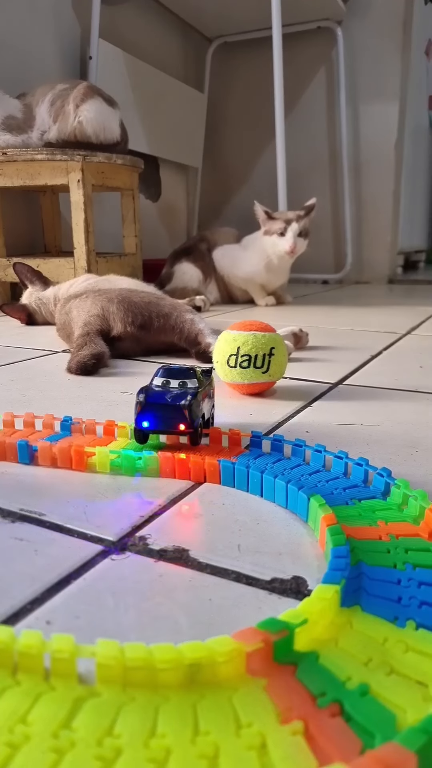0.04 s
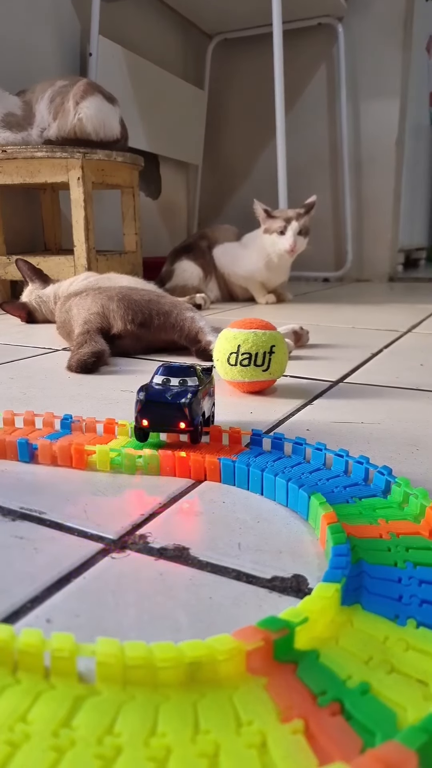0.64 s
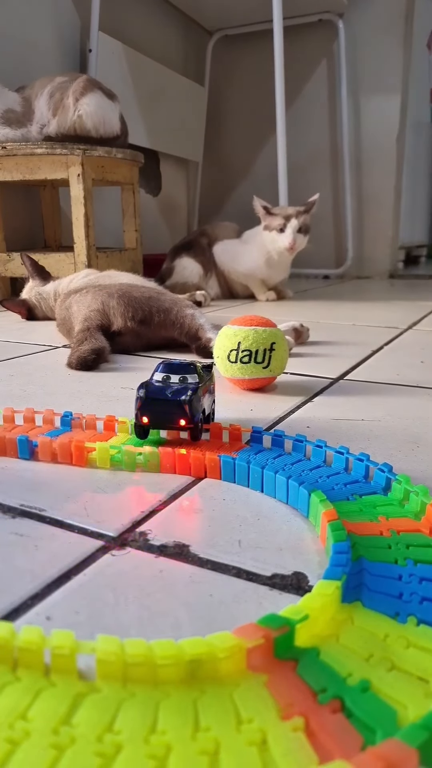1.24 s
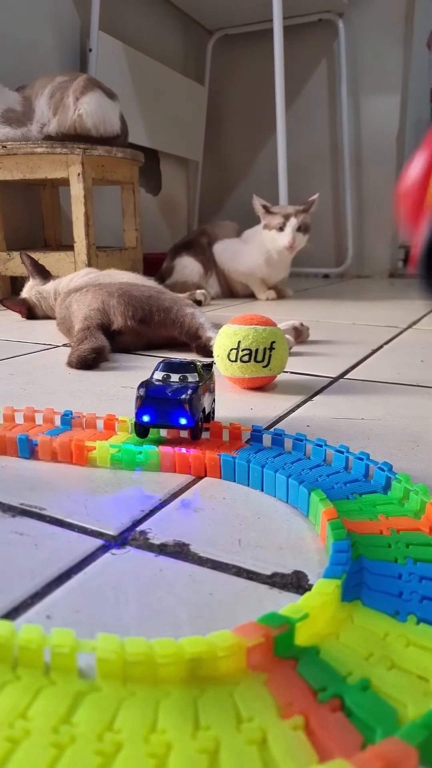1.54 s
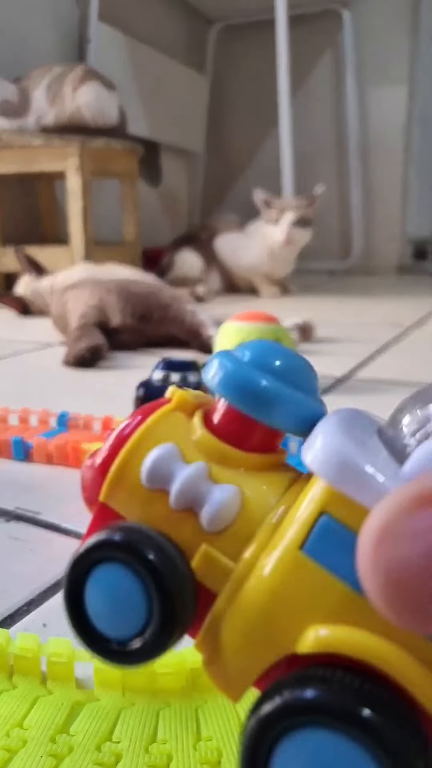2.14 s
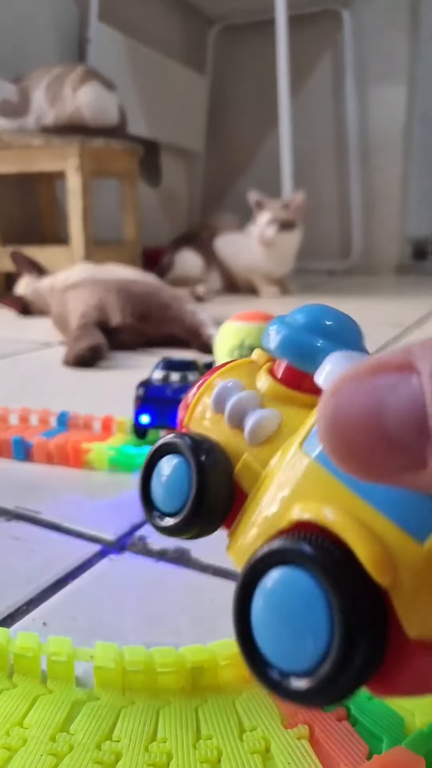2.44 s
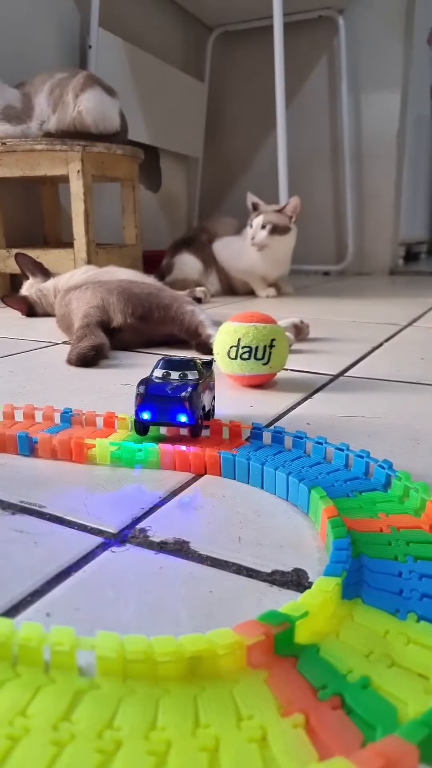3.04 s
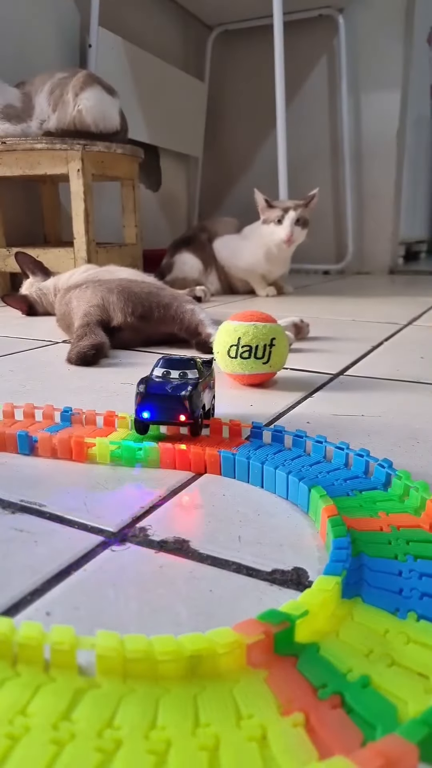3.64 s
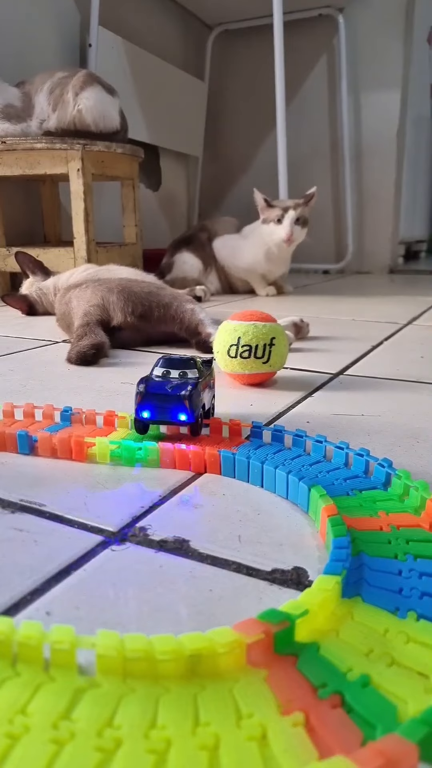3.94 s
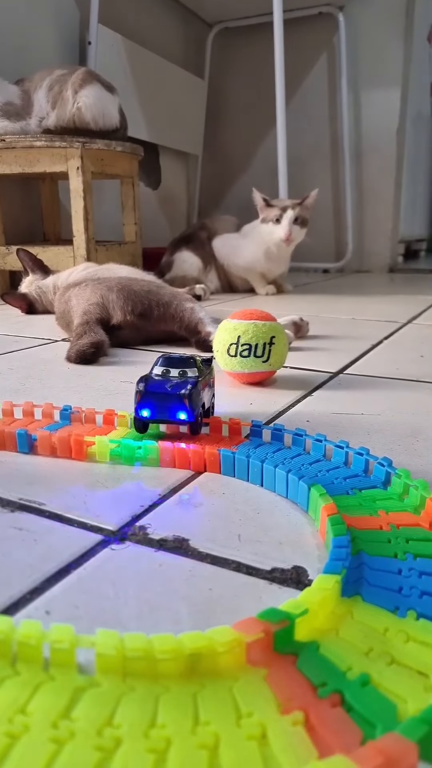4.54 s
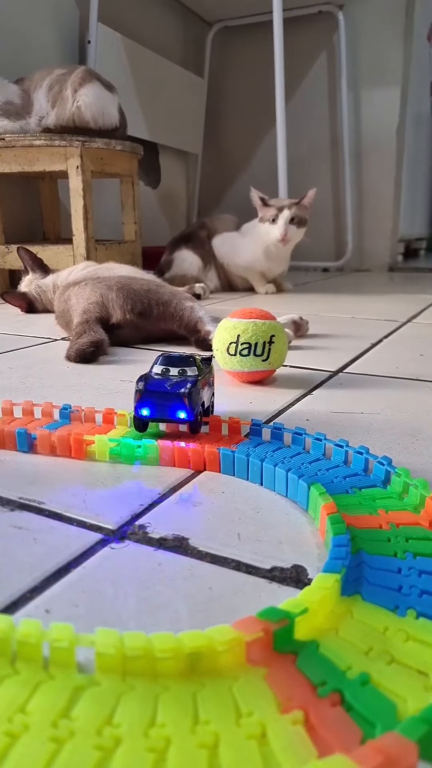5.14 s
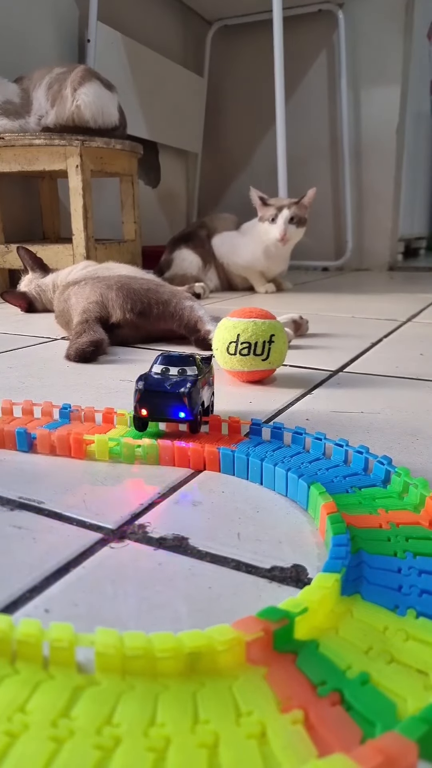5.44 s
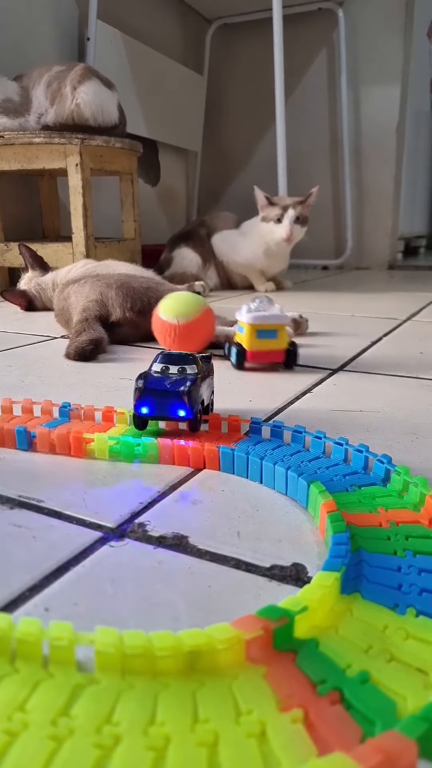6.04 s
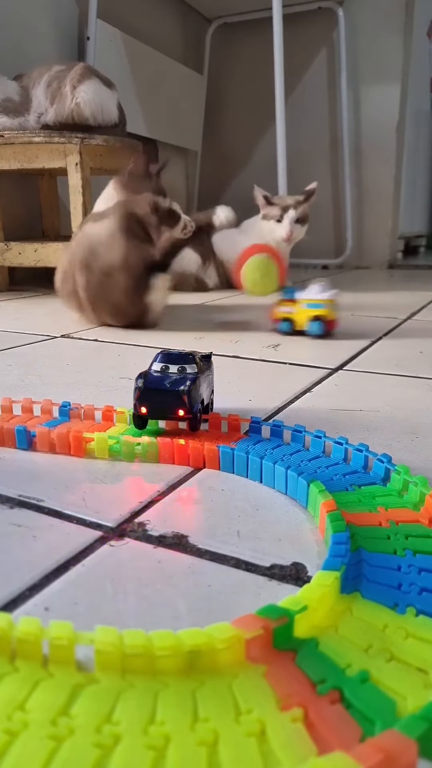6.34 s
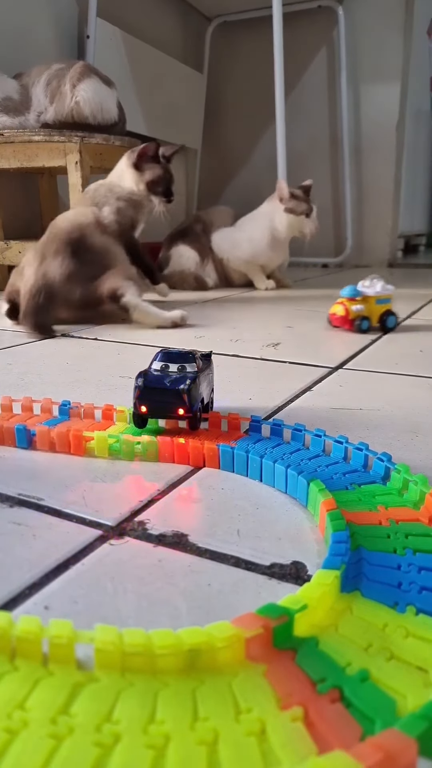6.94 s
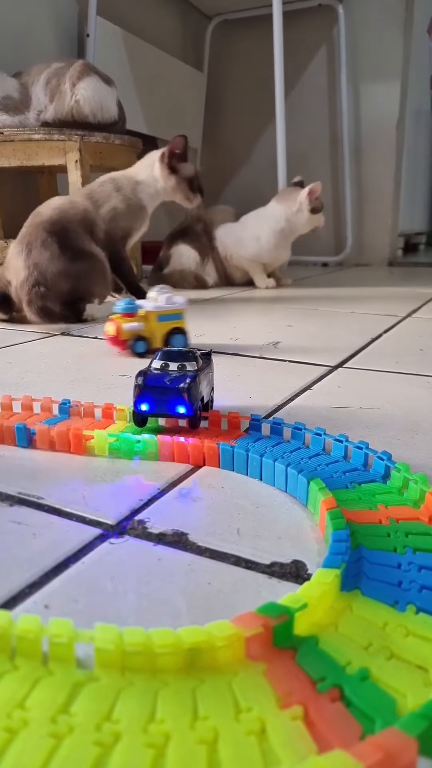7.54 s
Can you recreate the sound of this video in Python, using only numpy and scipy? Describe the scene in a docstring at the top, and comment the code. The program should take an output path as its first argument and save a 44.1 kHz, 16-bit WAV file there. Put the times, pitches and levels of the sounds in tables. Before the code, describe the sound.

A plastic toy car clacks and is pushed on a tiled floor, setting its gears whirring. Lifted close to the microphone, it fizzes and ticks while slowly running down. It clacks back onto the floor, is pushed again and let go, rattling further off and bumping a soft ball. Faint rubs and squeaks come from the handling, over a low room hum.

```python
"""A plastic flywheel toy car whirrs: it is pushed on a tiled floor, lifted close while its gears run down,
then pushed again and let go. It rattles off, bumps a ball and rolls back, further away.
One flywheel turns everything: gear teeth scrape and fizz, loose gears clatter in their case and shake
the hollow shell, and the axle ticks on its bearing. Jolts clack, wheels and fingers rub and squeak,
and the room hums low."""
import sys
import numpy as np
from scipy import signal
from scipy.fft import rfft, irfft, next_fast_len
from scipy.io import wavfile
from scipy.ndimage import map_coordinates

SR = 44100
rng = np.random.default_rng(int(sys.argv[2]) if len(sys.argv) > 2 else 0)


def persist_wave(psi):
    """Save psi, clipped to +-1, as 16-bit WAV."""
    counts = np.round(np.clip(psi, -1, 1) * 32767).astype(np.int16)
    wavfile.write(sys.argv[1], SR, np.atleast_2d(counts).T)


N = 343891

# where the car is: (time [s], share of its weight on the floor [0-1], distance [0 near, 1 far])
CAR_PLACE = [(0, 1, 0), (.7, 1, 0), (1.5, 0, 0), (3.6, 0, 0), (4.1, 1, 0), (5.3, 1, 0), (5.9, 1, 1),
             (7.8, 1, 1)]
# loudness of the running gears: (time [s], gear level [dB], treble level [dB])
WHIRR_LEVELS = [(0.66, -29, -35.5), (1.1, -30, -32), (1.5, -33, -28.5), (1.76, -30.5, -25.5),
                (2, -31, -32.5), (2.65, -30, -33), (3.02, -34.5, -36), (3.36, -39, -36.5), (3.68, -37, -39),
                (4.02, -29, -30), (4.2, -27.5, -30), (4.32, -27, -29.5), (4.6, -23.5, -31),
                (4.85, -25.5, -31), (5.25, -26.5, -34.5), (5.53, -22, -32.5), (5.73, -27.5, -38),
                (6.2, -32.5, -40.5), (6.95, -35.5, -39.5), (7.44, -35.5, -43), (7.8, -34.5, -44)]
# the axle's hardest catches: (time [s], level [dB])
AXLE_CATCHES = [(0.627, -10), (0.7158, -15), (.768, -18), (.824, -19), (.881, -20), (.935, -15.5),
                (.986, -19), (1.05, -19), (1.1443, -19), (1.2815, -15), (1.7569, -19), (1.8456, -19.5),
                (1.911, -16), (1.9759, -18), (2.1141, -14.5), (2.1824, -19), (2.5166, -19), (2.578, -19.5),
                (2.6598, -20), (2.7911, -19), (2.9542, -19), (3.0339, -22), (3.1014, -19), (3.187, -21),
                (3.3413, -16), (3.4984, -21), (3.5677, -22), (3.7234, -21)]
# jolts of the whole car: (time [s], level [dB], extra for its ring [dB], extra for its snap [dB])
CAR_JOLTS = [(0.024, -17.5, 8.5, -29), (0.049, -14.5, 2, -34), (0.102, -28, -6, -6), (0.159, -38, -8, -8),
             (0.211, -45, -9, 6), (0.405, -28, -1, -13), (0.414, -6, -3, -10), (0.429, -10, 0, -14),
             (.466, -24, 1, -4), (0.54, -11.5, 2, -6), (1.202, -5, -14, -28), (1.207, -14, -7, -25),
             (1.222, -8.5, -11, -26), (1.24, -9, -7, -24), (3.796, -15, 6, -22), (3.812, -10, -1, -18),
             (3.876, -15, 9, -24), (3.999, -6, 7.5, -27), (4.042, -7, 5, -22), (4.212, -12, 0, -21),
             (5.862, -19, -8, -26), (6.099, -12, -9, -30), (6.22, -18.5, 1, -17), (6.326, -18.5, 5, -11),
             (6.39, -12.5, -12, -6), (6.432, -16.5, 1, -16), (7.633, -21, 9, -21), (7.699, -12, -12, -40),
             (7.734, -19, 4, -28)]


def amp(db):
    """Turn decibels into a gain."""
    return 10 ** (np.asarray(db) / 20)


def unit(x):
    """Scale a sound so that the average of its channels has a strength (rms) of 1."""
    return x / np.sqrt(np.mean(np.atleast_2d(x).mean(0) ** 2) + 1e-20)


def curves(rows):
    """Join a table's rows with straight lines: one curve for each column after the time."""
    s, *columns = np.transpose(rows)
    return [np.interp(np.arange(N) / SR, s, column) for column in columns]


def wobble(rate):
    """A smooth random curve that heads for a new value `rate` times a second."""
    points = rng.standard_normal(int(N * rate / SR) + 4)
    return map_coordinates(points, [np.arange(N) * rate / SR], order=2)


def swells(rows):
    """One curve per stroke: it rises to 1 at its hardest moment and falls away."""
    s, rise_s, fall_s = np.transpose(rows)[:3, :, None]
    t = np.arange(N) / SR - s
    return np.exp(-np.maximum(-t / rise_s, t / fall_s))


def coloured(x, colour, size=2048):
    """Pass a stereo sound through a body whose colour makes some pitches louder than others."""
    hz, db = np.transpose(colour)
    gain = amp(np.interp(np.log(np.fft.rfftfreq(size, 1 / SR) + 1), np.log(hz), db))
    # folding the cepstrum makes the body ring after a blow, never before it
    cepstrum = irfft(np.log(np.maximum(gain, 1e-4)))
    cepstrum[1:size // 2] *= 2
    cepstrum[size // 2 + 1:] = 0
    ring = irfft(np.exp(rfft(cepstrum)))
    return signal.oaconvolve(x, ring[None] / np.linalg.norm(ring), axes=1)[:, :N]


def noise(colour, side_db):
    """Coloured stereo noise, mostly shared by both sides."""
    mid, side = coloured(rng.standard_normal((2, N)), colour, size=8192)
    return unit(np.array([mid + amp(side_db) * side, mid - amp(side_db) * side]))


def panned(x, left_db):
    """Lean a sound to one side, keeping its centre level."""
    left = amp(left_db)
    return x * np.array([[left], [1]]) * 2 / (1 + left)


def glides(rows, flutter):
    """Wavering tones that swell, slide in pitch and fade."""
    out, waver = np.zeros(N), 1 + flutter * wobble(40)
    for start, length, first_hz, last_hz, db in rows:
        span = np.arange(round(start * SR), min(N, round((start + length) * SR)))
        u = np.linspace(0, 1, len(span))
        hz = (first_hz + u * (last_hz - first_hz)) * waver[span]
        out[span] += amp(db) * np.sqrt(8 * u * (1 - u)) * np.sin(2 * np.pi * np.cumsum(hz) / SR)
    return out


def contacts(at, sizes, chatter_t60, chatter_db, room_db, early_t60=.04, early_db=-3, spots=5):
    """Blows land on a few spots, each with its own chatter, early floor echoes and room echo."""
    t = np.arange(SR // 5) / SR
    spot = rng.integers(spots, size=len(at))
    out = np.zeros((2, N))
    def dying(t60, channels=2):
        """A burst of noise that fades by 60 dB in t60 seconds."""
        burst = rng.standard_normal((channels, len(t))) * amp(-60 * t / t60)
        return burst / np.linalg.norm(burst, axis=1, keepdims=True)
    for k in range(spots):
        direct = (t == 0) + amp(chatter_db) * dying(chatter_t60, channels=1)
        echoes = amp(early_db) * dying(early_t60) + amp(room_db) * dying(t60=.22)
        blows = np.bincount(np.clip(at, 0, N - 1), sizes * (spot == k), N)
        out += signal.oaconvolve(blows[None], direct / np.linalg.norm(direct) + echoes, axes=1)[:, :N]
    return out


def slips(s, strength, spread_s=.003, count=20):
    """Each catch of a moving part is a short cluster of slips, strongest in its middle."""
    offset, scatter = rng.standard_normal((len(s), 2, count)).swapaxes(0, 1)
    offset[:, 0] = 0
    sizes = strength[:, None] * amp(2.5 + 1.1 * scatter) * np.exp(-1.15 * np.abs(offset))
    at = np.round((s[:, None] + .001 + spread_s * offset) * SR).astype(int)
    return contacts(at.ravel(), sizes.ravel(), chatter_t60=.02, chatter_db=-9, room_db=-3,
                    early_t60=.025, early_db=3)


def passes(turns):
    """The samples at which a new turn begins."""
    return np.flatnonzero(np.diff(np.floor(turns)) > 0)


def room():
    """A wavering low hum over a soft rumble; faint low tones come and go."""
    # the hum's note: (time [s], pitch [Hz])
    hum_pitch = [(0, 69.2), (.25, 62), (.6, 50), (1, 48.6), (2.5, 47.3), (4.5, 48.96), (7, 48.1), (7.8, 50)]
    # loudness of the hum and of the rumble: (time [s], level [dB])
    hum_level = [(0, -41), (.15, -42), (.25, -54), (1, -45.5), (2.5, -45), (2.8, -51.5), (5.3, -59),
                 (5.55, -49.5), (6.7, -47), (6.85, -39), (7.6, -34.5), (7.8, -31)]
    rumble_level = [(0, -46.5), (.5, -47), (1, -46.5), (2.2, -47.5), (2.95, -42.5), (3.3, -45), (4, -42.5),
                    (4.3, -49), (5.6, -46.5), (7.8, -46)]
    # the rumble's colour: (frequency [Hz], level [dB])
    rumble_colour = [(20, -21), (45, -2.5), (65, -6), (90, 0.5), (105, -6), (125, 2.5), (180, -9),
                     (250, -15.5), (500, -27), (2000, -42), (15000, -39)]
    # the faint tones: (start [s], length [s], first pitch [Hz], last pitch [Hz], level [dB])
    drones = [(1.55, 0.75, 192, 184.5, -52), (6.1, 0.94, 144, 144, -49.5), (6.75, 0.36, 121.9, 135.6, -45)]
    hz = curves(hum_pitch)[0] + 1.9 * wobble(26)
    hum_db = curves(hum_level)[0] + 1.9 + 1.9 * wobble(24)
    hum = np.sqrt(2) * np.sin(2 * np.pi * np.cumsum(hz) / SR) * amp(hum_db)
    rumble = noise(rumble_colour, side_db=-26) * amp(curves(rumble_level)[0] + .96 * wobble(23))
    return panned(hum, left_db=-4.5) + panned(rumble, left_db=-1) + glides(drones, flutter=.0065)


def shaken(settle_s=.028, far_db=-5):
    """How hard the loose parts rattle after each jolt; they soon settle, and are fainter far off."""
    s, db = np.transpose(CAR_JOLTS)[:2]
    at = np.round(s * SR).astype(int)
    energy = np.bincount(at, amp(db + far_db * curves(CAR_PLACE)[1][at]) ** 2, N)
    return np.sqrt(signal.lfilter([1], [1, -np.exp(-2 / (settle_s * SR))], energy))


def rubbing(roll_db=-57, thud_db=-43):
    """Wheels and fingers make a dull, uneven rub that swells with each scuff and jolt."""
    # the rub's colour: (frequency [Hz], level [dB])
    rub_colour = [(120, -18), (220, -1), (320, -6), (440, 2), (620, -4), (900, -0.5), (1500, -23.5)]
    # wheels scuff the tiles or fingers slide on the shell: (time [s], rise [s], fall [s], level [dB])
    scuffs = [(.02, 0.034, 0.16, -52), (.55, 0.06, 0.036, -35), (2.62, 0.21, 0.29, -45.5),
              (3.02, 0.089, 0.17, -44.5), (4.15, 0.089, 0.057, -45), (5.58, 0.062, 0.043, -50)]
    # fingers squeak on plastic: (start [s], length [s], first pitch [Hz], last pitch [Hz], level [dB])
    squeaks = [(.475, 0.035, 443, 540, -40), (.545, 0.058, 620, 820, -43), (2.35, 0.58, 438, 433, -57.5),
               (2.92, 0.12, 407, 380, -49.5)]
    scuff_power = amp(np.transpose(scuffs)[3]) ** 2 @ swells(scuffs) ** 2
    gain = np.sqrt(amp(roll_db) ** 2 + scuff_power + (amp(thud_db) * shaken()) ** 2)
    rub = noise(rub_colour, side_db=-10) * gain * amp(1.5 * wobble(30))
    return rub + glides(squeaks, flutter=.017)


def ball_bump():
    """The car hits a soft ball, which takes the blow without ringing."""
    # the hit: (time [s], level [dB])
    hit = (6.386, -16.5)
    # the ball's dull colour: (frequency [Hz], level [dB])
    ball_colour = [(80, -12), (200, -1), (400, -4), (750, -2), (1000, 3), (1800, -8), (3500, -1),
                   (8000, -19)]
    s, db = hit
    blow = contacts([round(s * SR)], amp([db + 11]), chatter_t60=.024, chatter_db=26, room_db=-2, spots=1)
    return coloured(blow, ball_colour)


def far_clacks(at, sizes, detune):
    """Further off, a blow is heard as the shell's short ringing notes, a little different each time."""
    # the shell's own notes: (pitch [Hz], level [dB], time to fade by 60 dB [s])
    shell_notes = [(1400, -9, .025), (2170, -2, 0.02), (2600, 0.5, 0.021), (2930, -5, .018),
                   (4480, -2, 0.02), (6620, -17, 0.012)]
    hz, db, t60 = np.transpose(shell_notes)[:, :, None]
    attack_s, scatter_db, echo_db, echo_t60 = .0009, 2, -23, .035
    t = np.arange(SR // 20) / SR
    out = np.zeros((2, N + len(t)))
    for start, size in zip(at, sizes):
        pitch, level = rng.standard_normal((2, len(hz), 1))
        fade = amp(db + scatter_db * level - 60 * t / t60)
        notes = fade * np.sin(2 * np.pi * hz * (1 + detune * pitch) * t)
        clack = notes.sum(0) * (1 - np.exp(-t / attack_s))
        clack *= size / np.abs(clack).max()
        path = (t == 0) + amp(echo_db - 60 * t / echo_t60) * rng.standard_normal((2, len(t)))
        out[:, start:start + len(t)] += signal.fftconvolve(path, clack[None], axes=1)[:, :len(t)]
    return out[:, :N]


def shell_jiggle(clacks_per_s=90, over_whirr_db=4.5, scatter_db=2):
    """Once the car rolls away over the tiles, its loose shell chatters unevenly."""
    at = np.flatnonzero(rng.random(N) < clacks_per_s * curves(CAR_PLACE)[1] / SR)
    scatter = np.clip(rng.standard_normal(len(at)), -2, 2)
    db = curves(WHIRR_LEVELS)[0][at] + over_whirr_db + scatter_db * scatter
    return far_clacks(at, amp(db), detune=.012)


def jolts():
    """The car meets the floor, hand or ball: its shell clacks, its hollow rings, with a hard snap."""
    # colours of the clack, ring and snap: (frequency [Hz], level [dB])
    clack_colour = [(100, -32), (400, -23), (800, -14.5), (1150, 7), (1480, 14.5), (2000, -1), (2850, 2.5),
                    (3700, 2), (5000, 9.5), (6500, 5.5), (9000, 0.5), (12000, -36)]
    ring_colour = [(700, -30), (1250, -24), (1450, -6), (1550, 1.5), (1700, -15), (2100, -23), (4000, -60)]
    snap_colour = [(3000, -52), (7000, 4.5), (9000, -8), (10500, -4.5), (13500, 1.5), (15500, -34)]
    s, db, ring_db, snap_db = np.transpose(CAR_JOLTS)
    at = np.round(s * SR).astype(int)
    away = curves(CAR_PLACE)[1]
    clack = contacts(at, amp(db + 10), chatter_t60=.03, chatter_db=26, room_db=-6,
                     early_t60=.03, early_db=0)
    ring = contacts(at, amp(db + ring_db + 7.5), chatter_t60=.025, chatter_db=10, room_db=-7, early_db=-5)
    snap = contacts(at, amp(db + snap_db + 16.5), chatter_t60=.012, chatter_db=4, room_db=-2, early_db=3)
    near = coloured(clack * (1 - away), clack_colour)
    far = far_clacks(at, amp(db) * away[at], detune=.015)
    return near + far + coloured(ring, ring_colour) + coloured(snap, snap_colour)


def wheel_turns(turns, gear_ratio=7.5):
    """Turn flywheel turns into wheel turns, counted from the spot where the axle catches."""
    count = turns / gear_ratio
    at = np.round(np.transpose(AXLE_CATCHES)[0] * SR).astype(int)
    spot = np.unwrap(2 * np.pi * (count[at] % 1)) / (2 * np.pi)
    return count - np.interp(np.arange(N), at, spot)


def axle_ticks(turns, graze_db=8, scatter_db=1):
    """The lifted axle grazes its bearing once a wheel turn; now and then it catches harder."""
    # a tick's colour: (frequency [Hz], level [dB])
    tick_colour = [(500, -26), (1400, -2.5), (2200, -10), (4000, -23), (5200, -2), (6200, -2.5),
                   (7300, -3.5), (9000, -33), (15000, -8)]
    catch_s, catch_db = np.transpose(AXLE_CATCHES)
    at = passes(wheel_turns(turns))
    lifted = 1 - curves(CAR_PLACE)[0][at]
    db = curves(WHIRR_LEVELS)[0][at] + graze_db + scatter_db * rng.standard_normal(len(at))
    ticks = slips(np.r_[catch_s, at / SR], np.r_[amp(catch_db), lifted * amp(db)])
    return coloured(ticks, tick_colour) * amp(2)


def running_db(stall_s=.055, start_s=.412):
    """A feeble first spin dies away; once the flywheel is set going, the gears run at full level."""
    feeble_db, fall_db_per_s, rest_db = -15, 150, -35
    t = np.arange(N) / SR
    dying_db = np.maximum(feeble_db - fall_db_per_s * np.maximum(t - stall_s, 0), rest_db)
    return np.where(t < start_s, dying_db, 0)


def cog_knocks(turns, knock_db=8.5, scatter_db=1.4, body_db=-3):
    """While it drives the wheels, the half-speed gear knocks once a turn; at times it jumps a tooth."""
    # teeth jump under load: (time [s], level [dB])
    jumps = [(0.5582, -13), (0.585, -14), (0.606, -11), (4.1104, -11), (4.1188, -15), (4.1384, -13),
             (4.1624, -7.5), (4.17, -11), (4.1844, -9), (4.194, -11), (4.5455, -13), (4.5756, -12.5),
             (4.7243, -13), (4.767, -15), (4.814, -16), (4.8654, -15), (5.049, -15), (5.1179, -14.5),
             (5.257, -14.5), (5.3309, -12.5), (5.4011, -12.5), (5.4701, -12), (5.5464, -13)]
    # colours of the gear's click and the body's answer: (frequency [Hz], level [dB])
    click_colour = [(2500, -30.5), (3900, -17), (4950, 7.5), (5900, 1.5), (6900, 5), (8000, -6.5),
                    (9000, -7), (12000, -43)]
    body_colour = [(500, -50.5), (1000, -10), (1470, 5), (1950, -16.5), (2350, -5.5), (2800, 2),
                   (3400, -30.5), (4500, -37.5)]
    grounded, away = curves(CAR_PLACE)
    at = passes(turns / 2)
    load = grounded[at] ** 10 * (1 - .7 * away[at])
    whirr_db = curves(WHIRR_LEVELS)[0] + running_db()
    db = whirr_db[at] + knock_db + scatter_db * rng.standard_normal(len(at))
    jump_s, jump_db = np.transpose(jumps)
    s, strength = np.r_[jump_s, at / SR], np.r_[amp(jump_db), load * amp(db)]
    click, body = slips(s, strength), slips(s, strength)
    return coloured(click, click_colour) + amp(body_db) * coloured(body, body_colour)


def placed(x, held, near, far):
    """A part has one colour in the hand, one on the floor nearby and one further off."""
    grounded, away = curves(CAR_PLACE)
    shares = 1 - grounded, grounded * (1 - away), grounded * away
    return sum(share * unit(coloured(x, colour)) for share, colour in zip(shares, (held, near, far)))


def part_gain(level_db, response, push):
    """How loud one part is: its level in that place, raised by a push, plus its rattle after jolts."""
    held_db, near_db, far_db, push_db, jolt_db = response
    grounded, away = curves(CAR_PLACE)
    place_db = (1 - grounded) * held_db + grounded * ((1 - away) * near_db + away * far_db)
    return np.hypot(amp(level_db + running_db() + place_db + push_db * push), amp(jolt_db) * shaken())


def resonance(blows, track, width_hz):
    """A gliding ring: the blows are shifted down to 0 Hz, kept in a narrow band and shifted back."""
    hz, db = curves(track)
    spin = np.exp(2j * np.pi * np.cumsum(hz) / SR)
    band = signal.butter(2, width_hz / 2, fs=SR)
    return unit((signal.lfilter(*band, blows / spin) * spin).real) * amp(db + running_db())


def ringing(clatter):
    """The clatter makes the gear case whine, the gears sizzle and the car's hollow sing one note."""
    # these three rings shift with grip, load and distance: (time [s], pitch [Hz], level [dB])
    whine = [(.42, 4500, -35), (.5, 5000, -44), (.62, 5750, -31), (.68, 5350, -41), (.95, 5270, -39),
             (1.15, 5200, -44), (1.33, 5080, -37), (1.45, 5050, -46), (1.6, 5200, -52), (3.99, 6000, -62),
             (4.002, 6050, -25), (4.05, 5900, -39), (4.17, 5000, -30), (4.24, 5000, -45), (4.6, 4960, -42),
             (5.4, 4880, -41), (5.8, 4550, -45), (5.9, 4500, -38), (6.08, 4500, -38), (6.2, 4480, -46),
             (7.3, 4480, -50), (7.55, 4490, -41)]
    sizzle = [(.45, 13800, -38), (.6, 13500, -33), (.7, 13900, -44), (1.251, 13800, -48), (1.6, 13700, -33),
              (2.4, 14500, -30.5), (2.9, 13730, -34.5), (3.202, 14150, -54), (4.2, 13310, -42),
              (5.3, 13800, -53), (6.1, 14290, -41), (6.8, 13400, -52)]
    hollow_note = [(.42, 1490, -29), (.47, 1490, -31.5), (.585, 1523, -19.5), (.67, 1460, -38),
                   (1.149, 1475, -36.5), (1.42, 1460, -45), (1.65, 1500, -36.5), (2.3, 1340, -55),
                   (3.151, 1484, -43.5), (3.68, 1410, -48.5), (3.8, 1500, -35), (3.97, 1560, -38),
                   (4.01, 1550, -35), (4.08, 1550, -31), (4.135, 1480, -18), (4.29, 1397, -41.5),
                   (4.661, 1460, -32.5), (5.01, 1490, -37), (5.52, 1402, -27), (5.7, 1362, -32),
                   (6.3, 1382, -38.5), (6.8, 1430, -38), (7.8, 1426, -44.5)]
    high = resonance(clatter, whine, width_hz=360) + resonance(clatter, sizzle, width_hz=1400)
    return high + resonance(clatter + clatter.mean(0), hollow_note, width_hz=177)


def teeth_fizz(turns, scrape_s=.0003):
    """Two gears meet eight and nine teeth per flywheel turn, and every tooth scrapes briefly."""
    # the teeth's colour in the hand, nearby and far off: (frequency [Hz], level [dB])
    held = [(5760, -29), (9800, -2), (10700, -3), (11300, -3.5), (12500, -4), (13700, -1), (14500, 0),
            (15200, 12.5), (15500, 6), (16000, 1.5)]
    near = [(5760, -32), (9800, 2), (11000, -1.5), (11700, 5), (12800, 1), (14200, 8), (14900, 10),
            (15300, 13), (16000, 4)]
    far = [(5760, -38), (9800, -6), (10400, -4.5), (11300, 2.5), (12050, -5), (13000, -1), (14200, 1.5),
           (15400, 3.5), (16000, -6)]
    first, second = passes(8 * turns), passes(9 * turns)
    at = np.r_[first, second]
    gear_db = np.r_[np.zeros(len(first)), np.full(len(second), -4)]
    lean_db = 2.2 * np.sin(2 * np.pi * turns[at])  # the off-centre flywheel presses once a turn
    press = np.bincount(at, amp(gear_db + lean_db + 3 * rng.standard_normal(len(at))), N)
    scrape = signal.lfilter([1], [1, -np.exp(-1 / (scrape_s * SR))], press) * rng.standard_normal(N)
    echoes = contacts(np.arange(N), scrape, chatter_t60=.009, chatter_db=6, room_db=12, early_db=37)
    direct = .75 - .45 * curves(CAR_PLACE)[0]  # lifted close, single teeth stand out from their echoes
    return placed(unit(echoes) * np.sqrt(1 - direct ** 2) + unit(scrape) * direct, held, near, far)


def loose_gears(turns, lifted, knocks_per_s=1700):
    """Loose gears knock at random, hardest once per turn of the half-speed gear and of the wheels."""
    at = np.flatnonzero(rng.random(N) < knocks_per_s / SR)
    wheel_db = (.56 + .66 * lifted) * np.cos(2 * np.pi * wheel_turns(turns))  # free wheels wobble more
    load_db = 2.1 * np.sin(np.pi * turns) + wheel_db + (1.9 - .6 * lifted) * wobble(90)
    scatter_db = (2.5 - 1.4 * lifted[at]) * np.clip(rng.standard_normal(len(at)), -2, 2)
    sizes = amp(load_db[at] + scatter_db)
    rattle = contacts(at, sizes, chatter_t60=.028, chatter_db=6, room_db=5, early_t60=.061, early_db=10)
    roomy = contacts(at, sizes, chatter_t60=.009, chatter_db=-3, room_db=28,
                     early_t60=.069, early_db=16.5)
    close = contacts(at, sizes, chatter_t60=.006, chatter_db=5, room_db=2, early_t60=.02, early_db=3)
    clatter = np.sqrt(1 - lifted) * unit(roomy) + np.sqrt(lifted) * unit(close)
    return rattle, clatter


def gearbox(turns):
    """The spinning gears shake their case, the car's shell and the hollow inside it."""
    # each part's colour in the hand, nearby and far off: (frequency [Hz], level [dB])
    hollow_held = [(350, -51), (600, -17), (745, -17), (1160, 0), (1300, 5), (1490, 6.5), (1680, -1),
                   (1900, -4), (2470, -34), (4180, -120)]
    hollow_near = [(350, -51), (600, -19.5), (717, -26.5), (891, -11.5), (1100, -9), (1350, 0), (1510, -1),
                   (1630, -11), (1780, -13), (1900, -1.5), (2470, -51), (4180, -120)]
    hollow_far = [(350, -59), (600, -28), (700, -29), (914, -11.5), (1060, -16), (1260, 2), (1440, 0),
                  (1610, -9), (1800, -0.5), (2280, -25), (3850, -120)]
    shell_held = [(1030, -16.5), (1750, 7), (2050, -2), (2500, 2.5), (2900, 5), (3550, 2.5), (4250, -3.5),
                  (5590, -1.5), (9460, -120)]
    shell_near = [(1030, -43), (1750, -21), (2050, -9.5), (2300, -5), (2500, -11.5), (2750, -3),
                  (3150, -4.5), (3450, -10.5), (3750, -14), (4300, -13.5), (5590, -11), (9460, -120)]
    shell_far = [(1000, -31.5), (1700, -8), (1850, 0), (1980, -4.5), (2150, 3.5), (2370, 3.5), (2560, 6),
                 (2760, 4), (2950, 6.5), (3300, 2), (3700, -2), (4180, -3.5), (4300, 7), (5590, -42),
                 (9460, -120)]
    case_held = [(2290, -28), (3900, -34), (4330, -6), (5220, 4), (5860, 4), (7410, 3), (8050, 8),
                 (8890, 6), (9290, 8.5), (9830, -44), (11000, -13), (14300, -39), (22000, -120)]
    case_near = [(2290, -36), (3900, -30), (4090, -7), (4780, 6), (5080, 10.5), (5760, 0), (6940, 6),
                 (7510, 0.5), (8700, 4), (9330, -9.5), (11000, -25), (14300, -54), (22000, -120)]
    case_far = [(2290, -20), (3900, -3), (4480, -13.5), (4760, 9.5), (5170, 7), (7190, 2), (8700, 5.5),
                (9870, -10), (11000, -22), (14300, -58), (22000, -120)]
    # each part's gain: (in the hand [dB], nearby [dB], far off [dB], full push [dB], jolt [dB])
    hollow_response = (1.5, -3.5, -3.5, 16.5, -23.5)
    shell_response = (-4.5, -8, -2, 13, -20.5)
    case_response = (-1, -6.5, -2, 8, -24.5)
    teeth_response = (-0.5, -0.5, 3, 7.5, -18.5)
    # loudness of the hollow's rattle: (time [s], level [dB])
    hollow_level = [(0.7, -41), (1.1, -38), (1.42, -45.5), (1.58, -48), (1.78, -35), (2.1, -41), (3.2, -43),
                    (3.65, -45), (3.82, -42.5), (3.96, -32.5), (4.35, -35), (4.65, -32), (5.15, -36.5),
                    (5.55, -32.5), (5.92, -30.5), (6.9, -36.5), (7.38, -34.5), (7.64, -31), (7.8, -31)]
    # the car is driven hard, by the hand or against the ball:
    # (time [s], rise [s], fall [s], forward effort [1 = full], pressure on the shell [1 = full])
    pushes = [(.05, 0.3, 0.015, 1.2, 0.84), (0.592, 0.054, 0.068, 1.38, 0.82),
              (3.83, 0.069, 0.067, 0.3, 0.14), (4.14, 0.048, 0.051, 0.68, 0.99),
              (4.195, 0.034, 0.031, 0.37, 1), (5.559, 0.29, 0.36, 0.28, 0.19),
              (6.52, 0.1, 0.054, 0.51, 0.4)]
    effort, pressure = np.transpose(pushes)[3:] @ swells(pushes)
    whirr_db, treble_db = curves(WHIRR_LEVELS)
    lifted = 1 - curves(CAR_PLACE)[0]
    surge_db = .93 * (1 - lifted) * wobble(14)  # on the tiles the rattle comes in uneven surges
    rattle, clatter = loose_gears(turns, lifted)
    # the hollow throbs once a wheel turn, more when the wheels run free
    throb_db = (.44 + 1.9 * lifted) * np.cos(2 * np.pi * wheel_turns(turns)) + 1.36 * wobble(45)
    hollow = placed(rattle, hollow_held, hollow_near, hollow_far)
    hollow *= part_gain(curves(hollow_level)[0] + throb_db + surge_db, hollow_response, effort)
    shell = placed(rattle, shell_held, shell_near, shell_far)
    shell *= part_gain(whirr_db + surge_db, shell_response, pressure)
    case = placed(clatter, case_held, case_near, case_far) * part_gain(whirr_db, case_response, pressure)
    fizz = teeth_fizz(turns) * part_gain(treble_db + wobble(14), teeth_response, effort)
    return hollow + shell + case + fizz + ringing(clatter) + cog_knocks(turns)


def microphones(car):
    """Two microphones hear the car unequally, depending on pitch and distance; the centre level stays."""
    # the balance nearby and far off: (frequency [Hz], left minus right [dB])
    near_balance = [(60, 0), (110, -1), (200, 0), (380, -6), (700, -2.5), (1290, -12), (2380, -1),
                    (4400, -7), (8120, -8), (15000, -9)]
    far_balance = [(60, -2.5), (150, 2), (380, -2), (950, -9), (2380, -1.5), (5980, -6), (15000, -1.5)]
    size = next_fast_len(N + SR // 4)
    spectrum, log_hz = rfft(car, size), np.log(np.fft.rfftfreq(size, 1 / SR) + 1)
    away = curves(CAR_PLACE)[1]
    out = np.zeros((2, N))
    for share, balance in ((1 - away, near_balance), (away, far_balance)):
        hz, db = np.transpose(balance)
        left = amp(np.interp(log_hz, np.log(hz), db))
        gains = np.array([left, np.ones_like(left)]) * 2 / (1 + left)
        out += share * irfft(spectrum * gains, size)[:, :N]
    return out


def scene():
    """One flywheel turns the gears and the axle; the car is handled and knocked about in a humming room."""
    # how fast the flywheel spins: (time [s], speed [turns a second])
    flywheel_speed = [(0, 40), (.4, 38), (.62, 148), (1, 120), (1.5, 118), (2, 125), (2.5, 101), (3, 120),
                      (3.9, 91), (4.22, 130), (4.85, 118), (5.4, 113), (6.4, 94), (7.8, 92)]
    turns = np.cumsum(curves(flywheel_speed)[0]) / SR
    car = gearbox(turns) + axle_ticks(turns) + jolts() + shell_jiggle() + ball_bump() + rubbing()
    return microphones(car) + room()


def record(dry):
    """Round off the highest peaks and cut away the very top of the treble."""
    ceiling, top_hz = .9, 15480
    rounded = dry / (1 + (dry / ceiling) ** 6) ** (1 / 6)
    size = next_fast_len(N + SR // 2)
    hz = np.fft.rfftfreq(size, 1 / SR)
    treble_cut = amp(-np.clip((hz - top_hz) / 8, 0, 120))
    return irfft(rfft(rounded, size) * treble_cut, size)[:, :N]


dry = scene()
out = record(dry)
persist_wave(out)
```